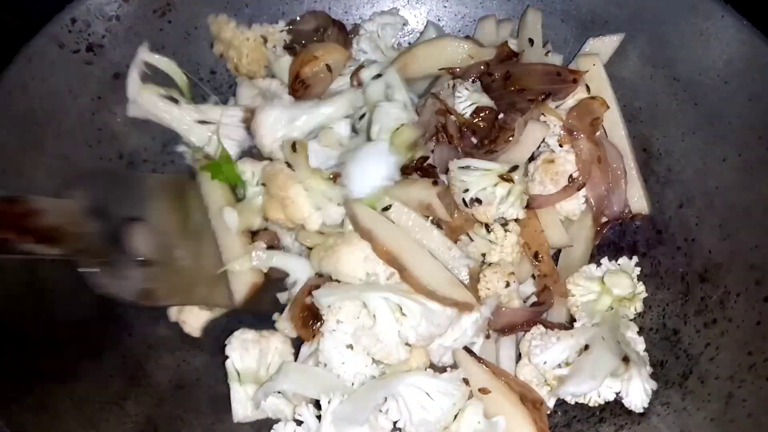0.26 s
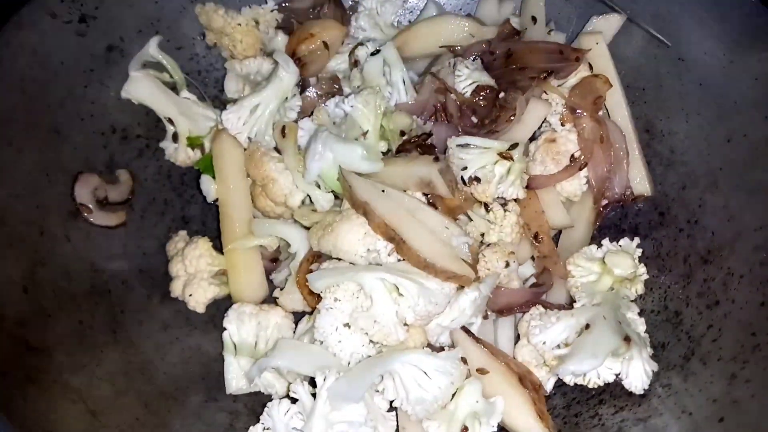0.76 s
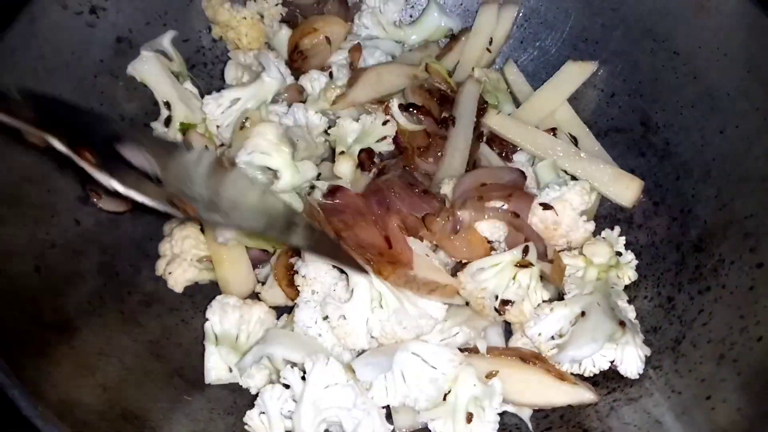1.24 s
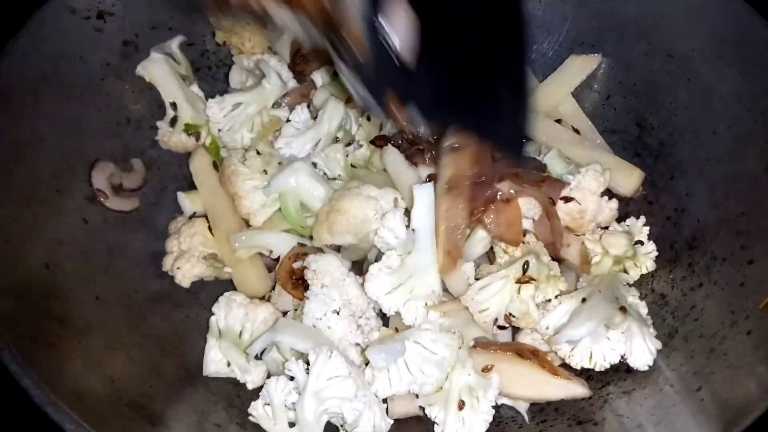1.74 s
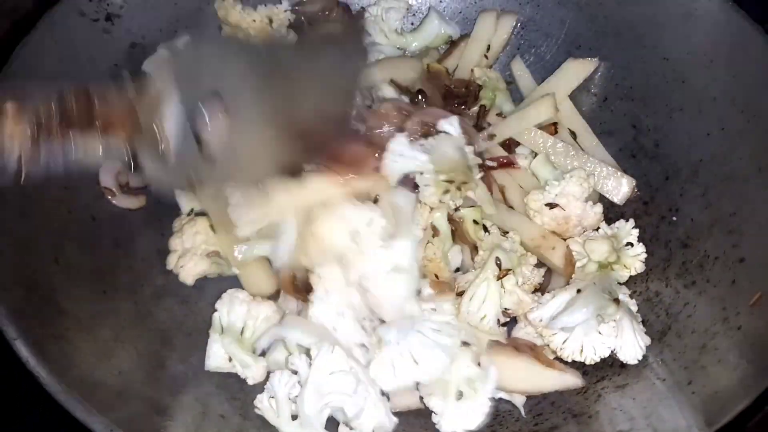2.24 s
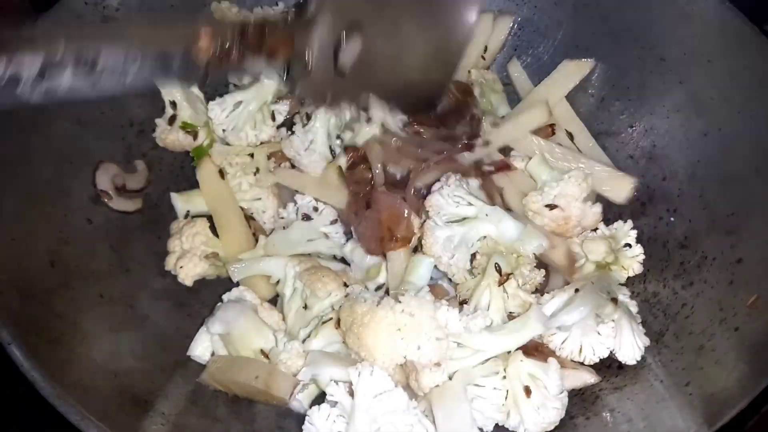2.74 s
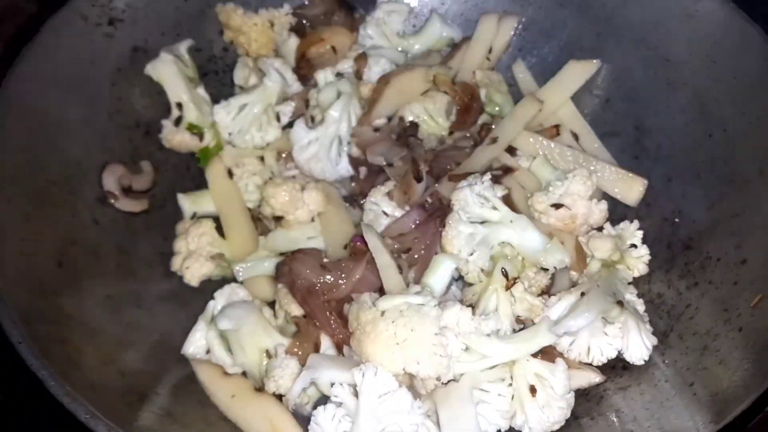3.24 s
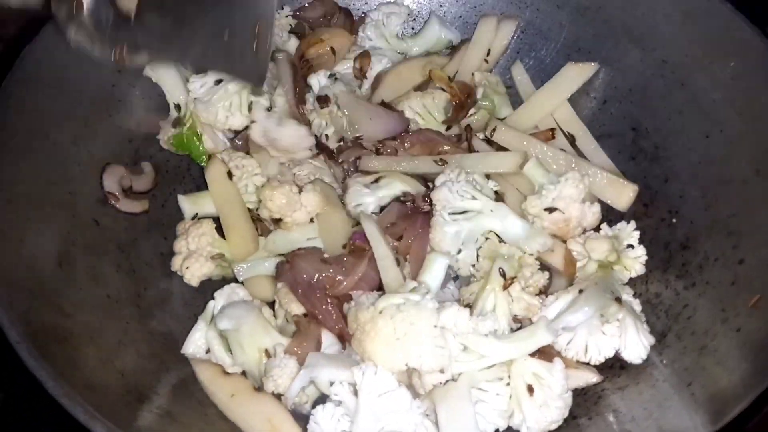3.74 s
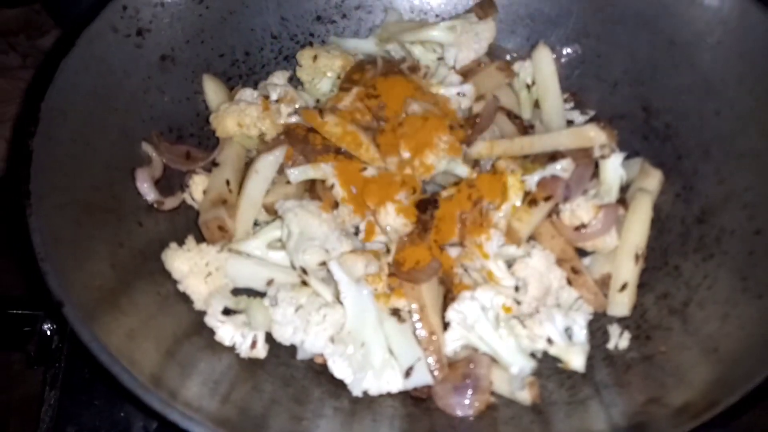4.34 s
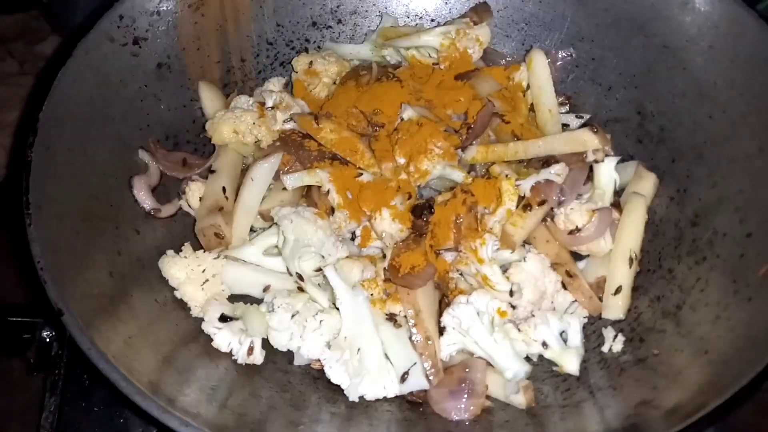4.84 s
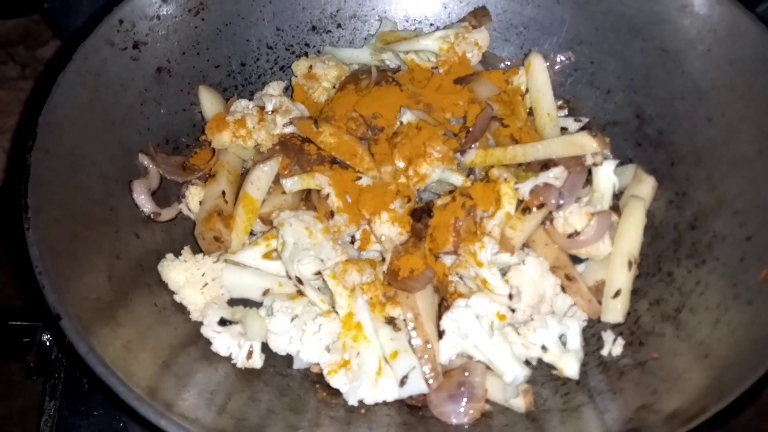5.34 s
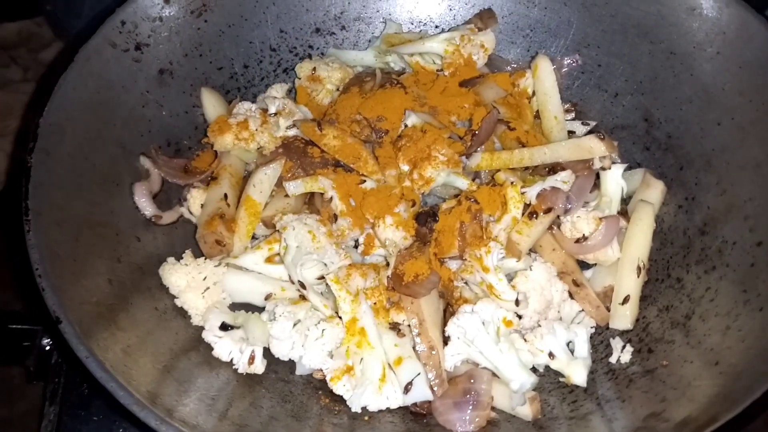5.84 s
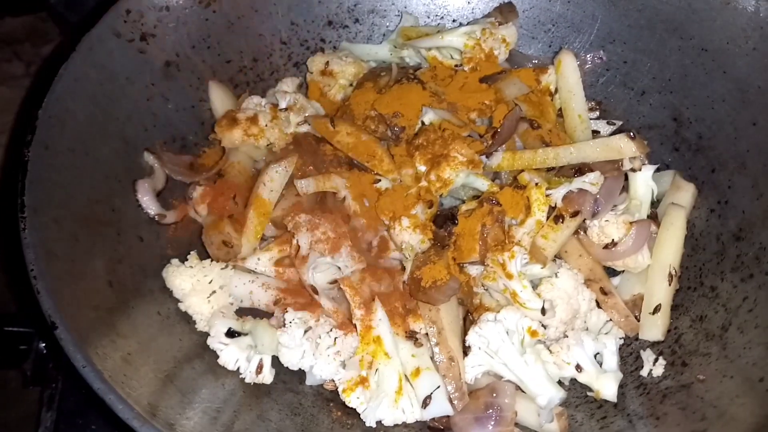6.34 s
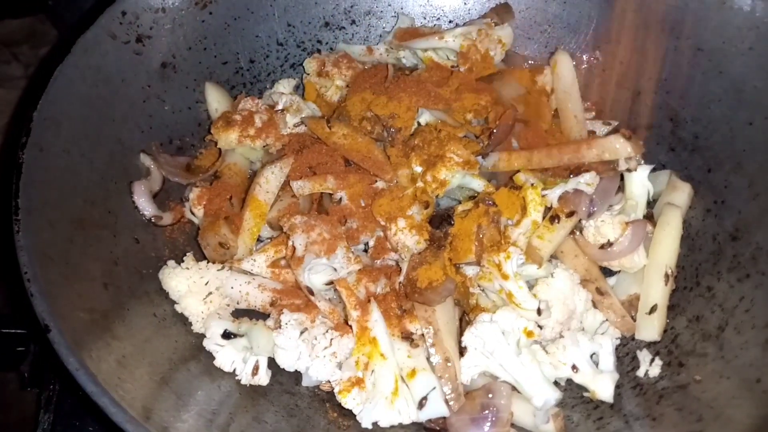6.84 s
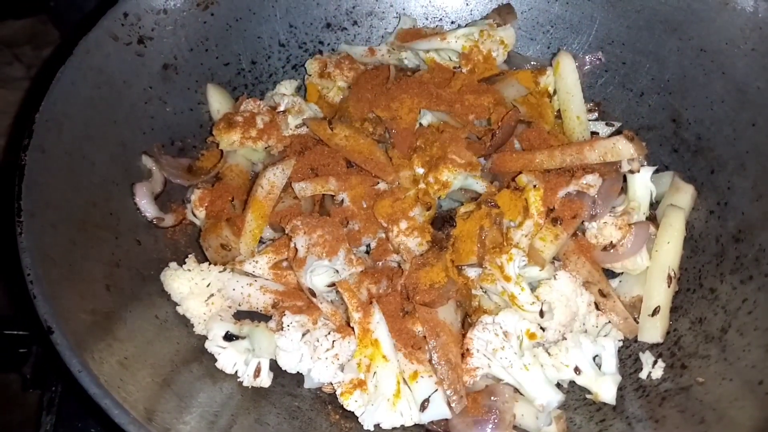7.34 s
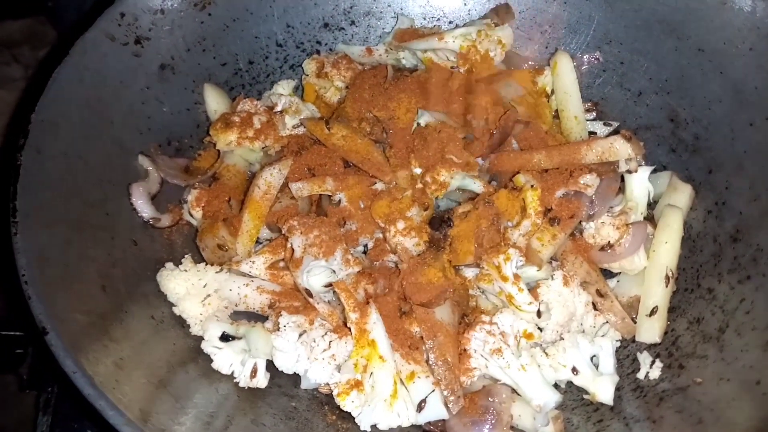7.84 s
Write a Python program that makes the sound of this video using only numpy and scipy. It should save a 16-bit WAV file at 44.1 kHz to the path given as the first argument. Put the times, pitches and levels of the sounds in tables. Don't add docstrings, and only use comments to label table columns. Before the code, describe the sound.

Vegetables fry in a steel wok with a loud, steady, bright sizzle and sharp oil spits, briefly cut silent midway, then crackling more densely.

```python
import sys
import numpy as np
from scipy import signal
from scipy.fft import rfft, irfft
from scipy.io import wavfile
from scipy.ndimage import uniform_filter1d, map_coordinates

SR = 44100
rng = np.random.default_rng(int(sys.argv[2]) if len(sys.argv) > 2 else 0)


def bounce(signal):
    frames = np.transpose(np.atleast_2d(signal))
    limited = np.clip(frames, -1, 1)
    pcm = np.round(limited * 32767).astype(np.int16)
    wavfile.write(sys.argv[1], SR, pcm)


def linear_from_db(decibels):
    return 10 ** (np.asarray(decibels, float) / 20)


N = 356769

# start_s, end_s
SILENCE = (3.8094, 3.8859)
# first_db, second_db
RUMBLE_DB = (-71.5, -76.5)
# first_db, second_db
BOWL_DB = (-17, -18.5)
# first_db, second_db
SHIMMER_DB = (-8.6, -6.8)
# frequency_hz, density_db (per Hz)
RUMBLE_SPECTRUM = [(20, -1), (50, -8), (100, -2), (170, -1), (250, 3.5), (320, -22), (500, -70)]
# frequency_hz, density_db (per Hz)
BOWL_SPECTRUM = [(120, -59), (200, -34), (350, -11), (461, -10), (667, -11), (807, -7), (1300, 0.5),
                 (1460, -4), (2130, -2), (2500, 2.5), (3250, -33.5), (5500, -120)]
# frequency_hz, density_db (per Hz)
FIZZ_SPECTRUM = [(900, -89), (2100, -20.5), (2400, -18.5), (2800, -14), (2950, -10.5), (3700, -8.5),
                 (4480, -3.5), (5200, -4), (6400, -1), (7500, -3.5), (9300, -8), (10600, -13.5),
                 (12000, -19), (14000, -36)]
# frequency_hz, density_db (per Hz)
SHIMMER_SPECTRUM = [(5000, -90), (10000, -30), (12300, -14), (13300, -11), (13950, -10), (14600, 0),
                    (15300, -1), (16000, -1)]
# centre_hz, width_hz, lift_db
MODES = [(249.4, 9.1, 7), (353.7, 13, 5.5), (396, 22, 3), (535, 36, 5.5), (604, 26, 7), (668.6, 18.5, 10.5),
         (721, 8.9, 9), (888, 7.9, 8), (1316, 41, 2.5), (1703, 320, 4), (2150, 230, -4), (6540, 180, 2),
         (8030, 260, -2)]
# centre_s, low_hz, high_hz, level_db
SIDE_HISSES = [(1.204, 4600, 5800, -33), (1.953, 9700, 11900, -47), (2.154, 5100, 7600, -28),
               (2.154, 9700, 11800, -41), (2.762, 4800, 8800, -40), (2.762, 9000, 12700, -50),
               (2.762, 13800, 15700, -54), (5.3385, 4800, 9700, -37), (5.3385, 10200, 15300, -55)]
# start_s, peak_db, push_hz
BUMPS = [(0.999, -62, 110), (1.05, -62, 110), (1.109, -65, 110), (1.369, -61, 80), (1.43, -62, 80),
         (1.941, -50.5, 130), (1.999, -65, 110), (2.248, -63, 110), (2.345, -47, 85), (2.759, -62, 110),
         (3.2, -64, 110), (3.519, -60, 110), (3.788, -65, 110), (3.92, -62, 110), (3.978, -56, 110),
         (4.55, -66, 110), (5.03, -51, 231), (5.339, -55, 100), (7.99, -65, 110)]
# time_s, level_db
HEAT = [(0.0, -23.5), (1.0, -22), (2.0, -23.5), (3.0, -22), (3.8, -23), (3.9, -24.1), (4.7, -23),
        (5.7, -26.5), (6.2, -23.5), (7.0, -23), (8.09, -23.5)]
# time_s, lift_db
SURGES = [(0.015, 1.4), (0.234, 2), (0.424, 1.5), (0.489, -0.5), (1.048, 0.5), (1.472, 2), (1.686, 1.2),
          (1.746, 1), (2.045, 2.5), (2.12, 2), (2.315, 2.7), (2.444, 1.5), (2.699, 1.5), (3.672, 2.1),
          (4.265, 1.2), (5.133, 1), (5.592, 2.5), (5.767, 2.7), (5.872, 3), (6.136, 0.7)]
# time_s, depth_db
DUCKS = [(0.933, 2.5), (1.132, 3.5), (1.541, 4.0), (1.796, 3.5), (2.24, 3.5), (2.37, 4.5), (2.504, 1.5),
         (2.769, 2.5), (3.048, 1.8), (3.253, 1.5), (3.487, 1.7), (3.971, 7), (4.31, 3.4), (4.43, 3.5),
         (4.545, 4), (4.654, 4.9), (4.759, 2.5), (4.869, 4), (4.964, 3), (5.059, 1.5), (5.233, 1.2),
         (5.353, 2.5), (5.453, 2.1), (5.652, 1.5), (5.951, 2), (6.346, 2), (6.74, 1), (7.184, 3.2),
         (7.558, 1.5), (7.767, 0.3)]
# start_s, peak_db, low_body_db (relative to peak)
CALM_SPITS = [(0.0859, -8.8, -31), (0.0981, -9.2, -28), (0.2751, -8.1, -26), (0.454, -9.4, -21),
              (0.5169, -7.2, -26), (1.0819, -9.4, -28), (1.1464, -7.6, -27), (1.231, -7.6, -33),
              (1.5972, -7.7, -30), (1.7776, -11.5, -25), (1.8814, -10.1, -28), (2.2446, -9.1, -29),
              (2.2621, -10.8, -23), (2.3485, -9.8, -23), (2.494, -10.7, -21), (2.5657, -9.1, -27),
              (2.7647, -8.8, -29), (3.0483, -8.1, -25), (3.2645, -10.4, -22), (3.5938, -9.8, -25),
              (6.384, -9.4, -28), (6.6258, -9.0, -32), (7.557, -8.9, -30), (7.7542, -9.9, -17),
              (7.8617, -10.7, -29), (7.9171, -9.5, -23)]
# start_s, peak_db, low_body_db (relative to peak)
SPICE_SPITS = [(3.8889, -5.8, -30), (3.9565, -9.8, -21), (3.9722, -11.9, -30), (4.043, -9.4, -19),
               (4.0612, -8.9, -28), (4.303, -7.3, -36), (4.4169, -10.2, -32), (4.5604, -10.3, -26),
               (4.6229, -7.6, -27), (4.657, -8.4, -32), (4.7481, -7.3, -31), (4.8569, -10.2, -30),
               (4.9613, -11.2, -25), (4.9707, -11.7, -23), (5.078, -8.6, -28), (5.1733, -10.0, -30),
               (5.2087, -9.3, -25), (5.2306, -7.0, -30), (5.3123, -10.8, -24), (5.3417, -9.7, -24),
               (5.4499, -10.2, -33), (5.4996, -8.8, -29), (5.5302, -8.2, -34), (5.5463, -7.4, -24),
               (5.6514, -9.1, -26), (5.7267, -10.9, -24), (5.8053, -10.4, -27), (5.9208, -8.0, -26),
               (5.9581, -9.6, -29), (5.978, -9.3, -30)]
# start_s, peak_db, low_body_db (relative to peak)
POPS = [
    (3.2149, -10, -17),
    (4.2908, -10.4, -18),
    (4.7739, -12, -18),
    (4.8042, -9.5, -19),
    (5.6898, -11, -16),
]
# time_s, rate_per_s
SPATTER = [
    (0, 5),
    (3.9, 5),
    (4.6, 8),
    (5.4, 20),
    (6, 14),
    (6.3, 5),
    (8.09, 4),
]


def unit(x):
    return x / np.sqrt(np.mean(x ** 2) + 1e-20)


def wobble(rate):
    knots = rng.standard_normal(int(N * rate / SR) + 4)
    return map_coordinates(knots, [np.arange(N) * rate / SR])


def lines(rows):
    s, *columns = np.transpose(rows)
    return [np.interp(np.arange(N) / SR, s, column) for column in columns]


def bells(rows, before_s, after_s):
    t = np.arange(0, N / SR, .002)
    swing = 0
    for s, db in rows:
        width_s = np.where(t < s, before_s, after_s)
        swing = swing + db * np.exp(-((t - s) / width_s) ** 2)
    return np.interp(np.arange(N) / SR, t, swing)


def by_shot(pair):
    return np.where(np.arange(N) < SILENCE[0] * SR, *pair)


def coloured(x, spectrum):
    size = 8192
    hz = np.fft.rfftfreq(size, 1 / SR)
    f, db = np.transpose(spectrum)
    db = np.interp(np.log(hz + 1), np.log(f), db)
    for centre_hz, width_hz, lift_db in MODES:
        db = db + lift_db / (1 + (2 * (hz - centre_hz) / width_hz) ** 2)
    cepstrum = irfft(np.log(linear_from_db(db) + 1e-4))
    cepstrum[1:size // 2] *= 2
    cepstrum[size // 2 + 1:] = 0
    pulse = irfft(np.exp(rfft(cepstrum)))
    return signal.fftconvolve(x, pulse / np.linalg.norm(pulse))[:N]


def patchy(patchy_db, size=256):
    z = signal.stft(rng.standard_normal(N), nperseg=size)[2]
    field = uniform_filter1d(rng.standard_normal(z.shape), size=5, axis=0)
    field = uniform_filter1d(field, size=2048 // size + 2, axis=1)
    return unit(signal.istft(z * linear_from_db(patchy_db * unit(field)), nperseg=size)[1][:N])


def kitchen():
    stir_db, stir_s = 2.5, 0.44
    stirs = [(s, stir_db) for s in (1.15, 2.1, 2.8, 5.2)]
    rumble_db = by_shot(RUMBLE_DB) + bells(stirs, stir_s, stir_s)
    return linear_from_db(rumble_db) * coloured(patchy(patchy_db=5.5, size=2048), RUMBLE_SPECTRUM)


def side_hisses():
    side, size = np.zeros(N), 1200
    hz = np.fft.rfftfreq(size, 1 / SR)
    for s, low_hz, high_hz, db in SIDE_HISSES:
        band = irfft(rfft(rng.standard_normal(size)) * (hz > low_hz) * (hz < high_hz), size)
        hiss = linear_from_db(db) * signal.windows.tukey(size, .5) * unit(band)
        side[round(s * SR) - size // 2:][:size] += hiss
    return side * np.array([[1], [-1]])


def spatula():
    x, t = np.zeros(N + SR), np.arange(SR // 20) / SR
    for s, db, hz in BUMPS:
        push = np.sin(2 * np.pi * hz * t) * linear_from_db(-60 * t / 0.027)
        slap = -2.2 * np.sin(2 * np.pi * 330 * t) * linear_from_db(-60 * t / 0.0061)
        x[round((s + .005) * SR):][:len(t)] += linear_from_db(db + 10) * (push + slap)
    return x[:N]


def drops():
    peak_db, peak_spread_db = -11.5, 1.2
    body_db, body_spread_db = -26, 3
    count = np.cumsum(lines(SPATTER)[0]) / SR
    luck = rng.standard_normal((int(count[-1]) - 1, 3))
    turn = np.arange(len(luck)) + .5 + .5 * np.tanh(luck[:, 0])
    when = np.searchsorted(count, turn) / SR
    small = np.c_[when, peak_db + peak_spread_db * luck[:, 1], body_db + body_spread_db * luck[:, 2]]
    return np.r_[CALM_SPITS, SPICE_SPITS, POPS, small]


def spits(rows, body):
    x = np.zeros(N + 64)
    shapes = .27 * rng.standard_normal((len(rows), 32)) * np.exp(-np.arange(32) / 12)
    shapes[:, 0] = np.sign(shapes[:, 0])
    for (s, db, body_db), shape in zip(rows, shapes):
        click = linear_from_db(db + body * body_db) * shape / np.linalg.norm(shape)
        x[max(round(s * SR) - 7, 0):][:32] += click
    return x[:N]


def bursts(rate, spread_db):
    when, size, sign = rng.random((3, N))
    strength = linear_from_db(np.minimum(-spread_db * np.log(size + 1e-9), 17))
    return unit((when < rate / SR) * strength * np.sign(sign - .5))


def sizzle_db():
    surge_s, fall_s, rise_s = 0.024, 0.027, 0.025
    chance_swells = 0.23 * wobble(14)
    surges = bells(SURGES, surge_s, surge_s) + chance_swells
    return lines(HEAT)[0] + surges - bells(DUCKS, fall_s, rise_s)


def frying():
    fizz_db, rows = sizzle_db(), drops()
    seething = .3 * wobble(35) + .35 * wobble(110) + .9 * wobble(500)
    crowd = linear_from_db(-3.5) * bursts(1800, spread_db=3.1)
    fizz = linear_from_db(fizz_db + seething) * unit(crowd + patchy(patchy_db=0.77))
    shimmer_db = fizz_db + seething + by_shot(SHIMMER_DB)
    shimmer = linear_from_db(shimmer_db) * unit(1.3 * crowd + patchy(patchy_db=-3.0))
    steady_db = uniform_filter1d(fizz_db, SR // 3)
    bowl_db = by_shot(BOWL_DB) + steady_db + 1.08 * (fizz_db - steady_db) + seething
    bowl = linear_from_db(bowl_db) * unit(crowd + patchy(patchy_db=1.87, size=512))
    fizz = fizz + linear_from_db(5.5) * spits(rows, 0)
    shimmer = shimmer + linear_from_db(-6) * spits(rows, 0)
    bowl = bowl + linear_from_db(11) * spits(rows, 1)
    bright = coloured(fizz, FIZZ_SPECTRUM) + coloured(shimmer, SHIMMER_SPECTRUM)
    return bright + coloured(bowl, BOWL_SPECTRUM)


def scene():
    return np.tile(kitchen() + spatula() + frying(), (2, 1))


def roll_off(x):
    return signal.sosfilt(signal.butter(12, 17090, fs=SR, output="sos"), x)


def record(dry):
    top_hz, fade_s = 15720, .001
    t, hz = np.arange(N) / SR, np.fft.rfftfreq(N, 1 / SR)
    shaved = dry - dry / (1 + np.abs(dry / .52) ** 8) ** (1 / 8)
    limited = rfft(dry) - rfft(shaved) * (hz > 2000)
    x = irfft(limited * (hz < top_hz), N)
    x = x + side_hisses() - .00009
    first_shot = np.sin(np.pi / 2 * np.clip((SILENCE[0] - t) / fade_s, 0, 1)) ** 2
    second_shot = t > SILENCE[1]
    return roll_off(x * (first_shot + second_shot))


dry = scene()
out = record(dry)
bounce(out)
```